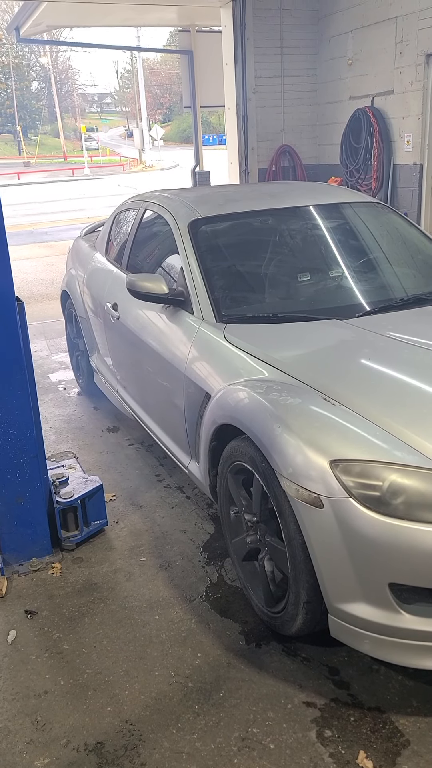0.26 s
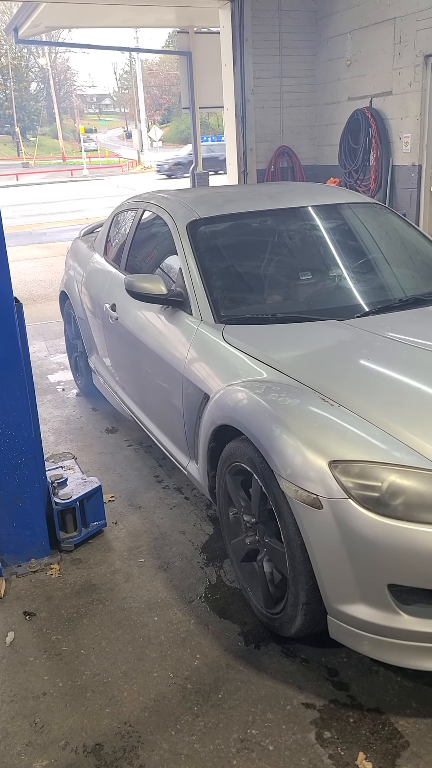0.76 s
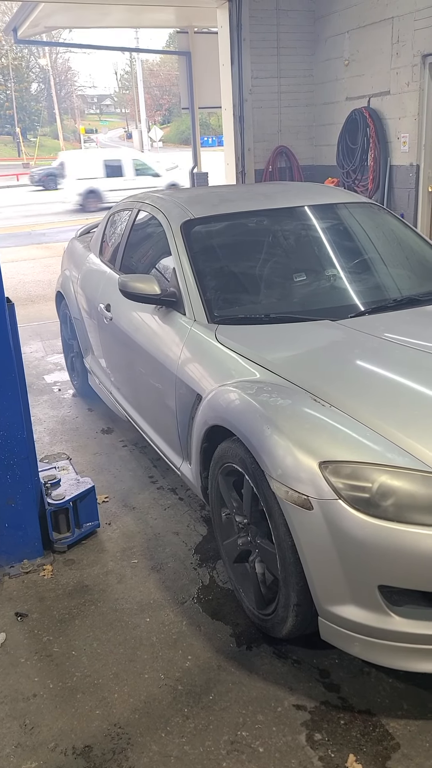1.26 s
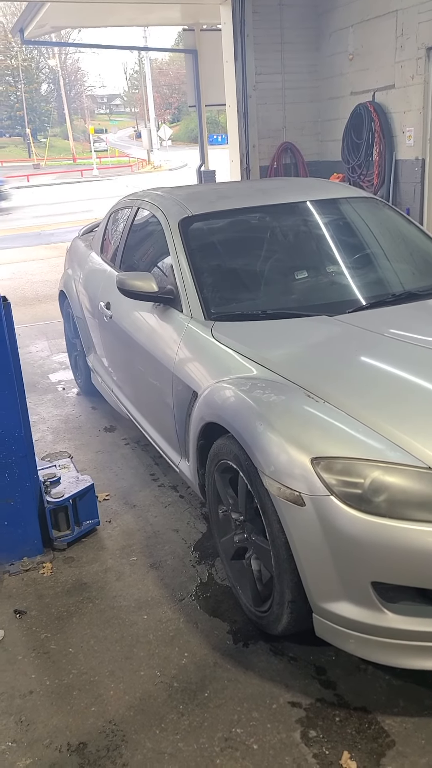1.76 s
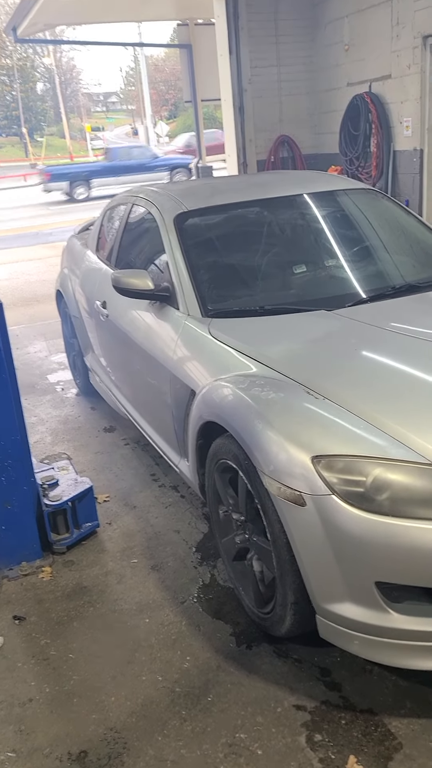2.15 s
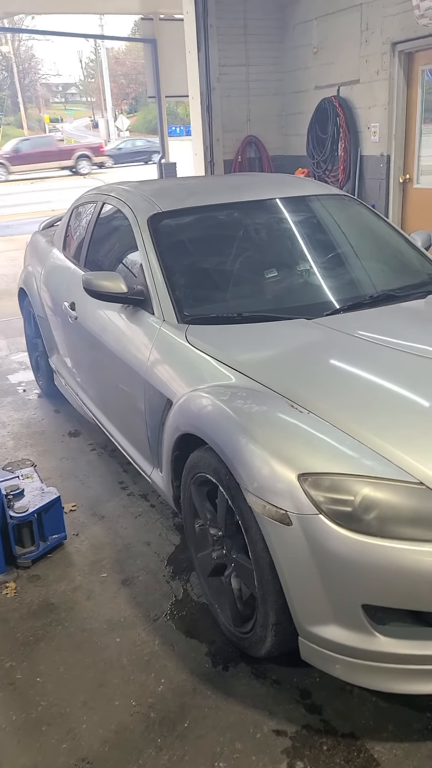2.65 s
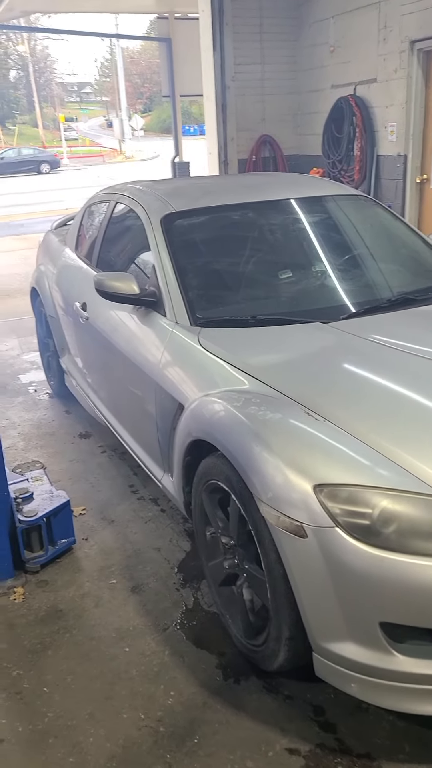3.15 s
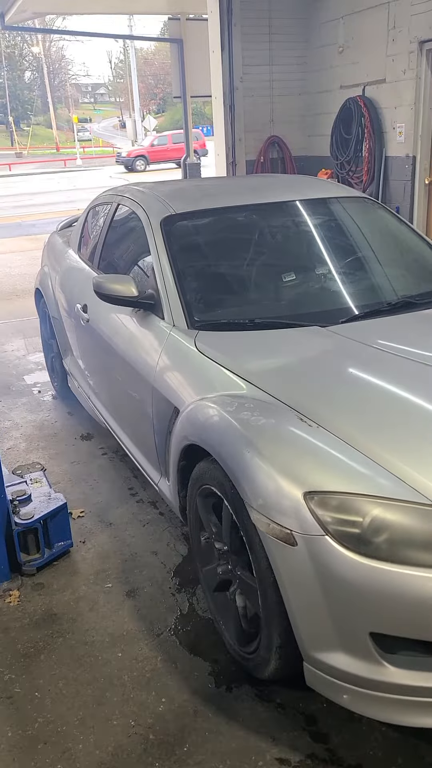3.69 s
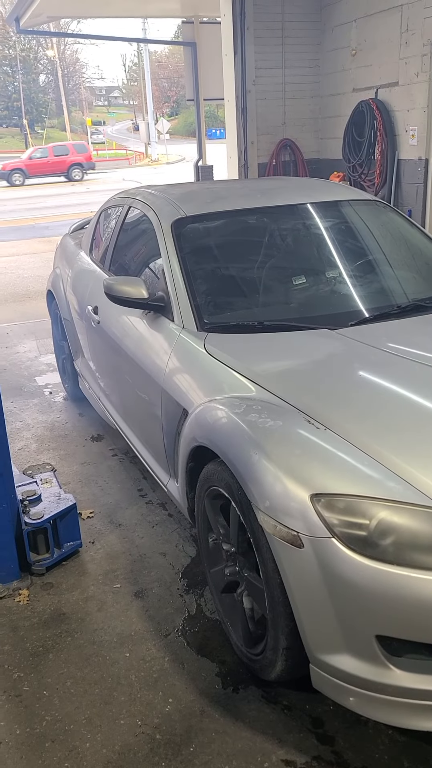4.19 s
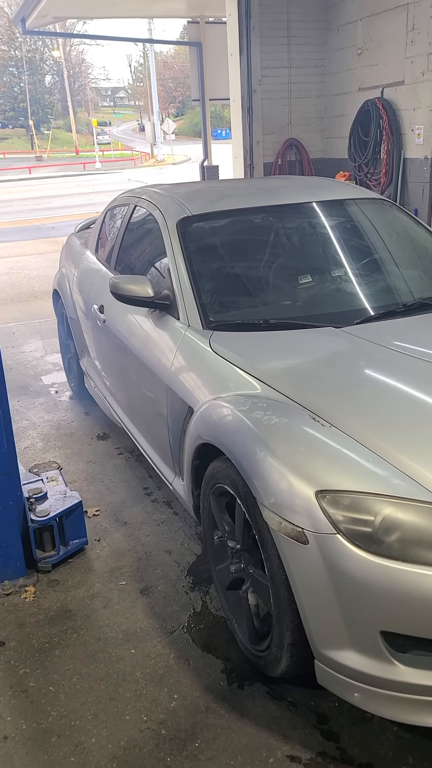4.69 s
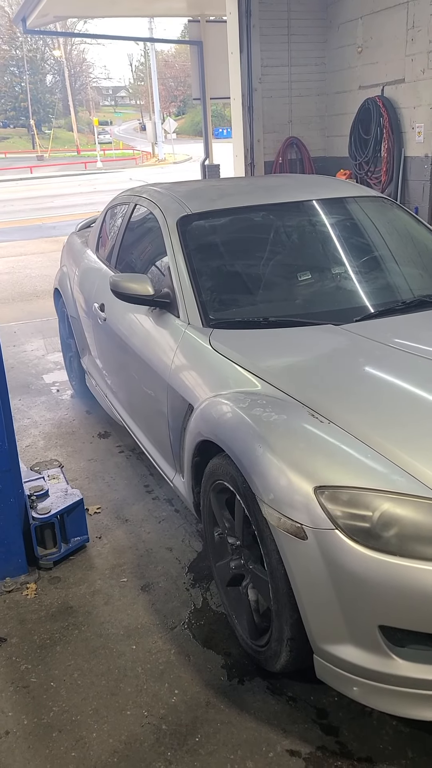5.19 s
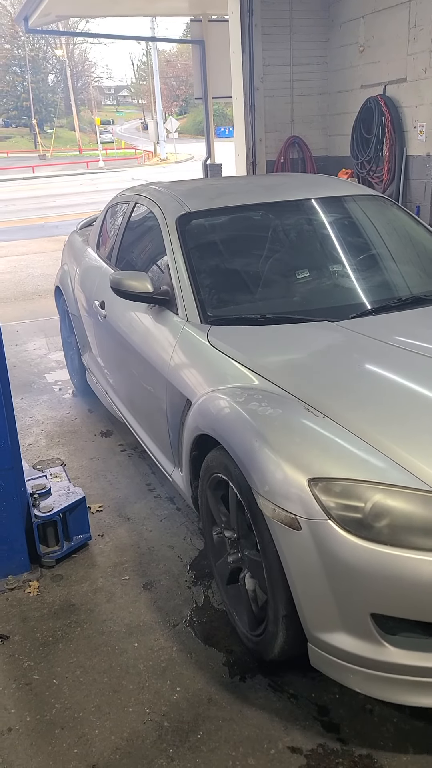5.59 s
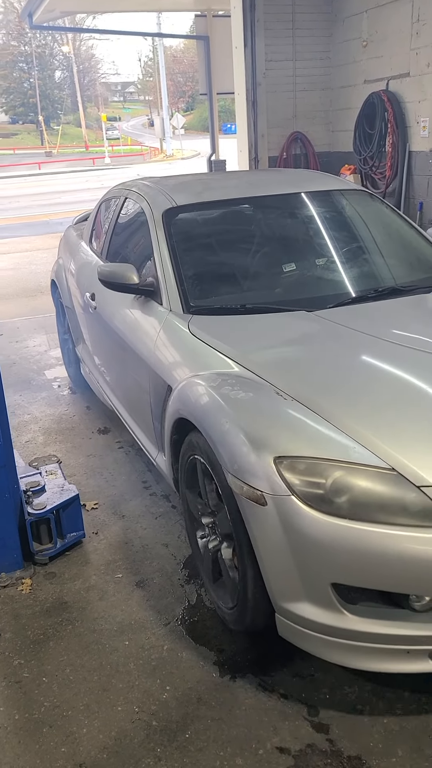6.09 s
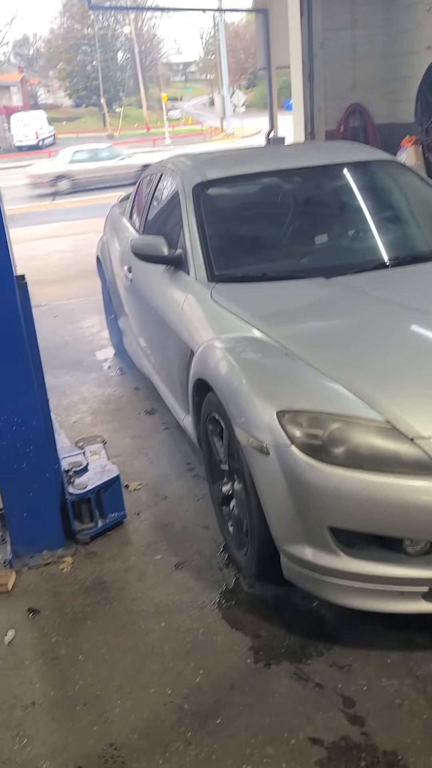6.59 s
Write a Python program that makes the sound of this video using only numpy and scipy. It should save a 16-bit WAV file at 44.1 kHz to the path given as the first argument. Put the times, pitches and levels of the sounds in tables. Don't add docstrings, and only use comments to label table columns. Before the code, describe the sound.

A car engine hums at a fast, steady idle in a concrete garage, then sags, stumbles roughly and settles into a lower, throbbing idle.

```python
import sys
import numpy as np
from scipy import signal
from scipy.fft import rfft, irfft, next_fast_len
from scipy.io import wavfile
from scipy.ndimage import uniform_filter1d

SR = 44100
rng = np.random.default_rng(int(sys.argv[2]) if len(sys.argv) > 2 else 0)


def wrap_up_sound(samples):
    columns = np.atleast_2d(samples).T
    tamed = np.clip(columns, -1, 1)
    steps = np.round(tamed * 32767).astype(np.int16)
    wavfile.write(sys.argv[1], SR, steps)


def magnitude_from_level(level_db):
    exponent = np.asarray(level_db, float) / 20
    return 10 ** exponent


N = 301644


def rms_one(x):
    return x / np.sqrt(np.mean(x ** 2) + 1e-20)


def in_time(rows):
    times_s, values = np.transpose(rows)
    return np.interp(np.arange(N) / SR, times_s, values)


def ramp(from_s, takes_s):
    return np.clip((np.arange(N) / SR - from_s) / takes_s, 0, 1)


def at_hz(points, hz):
    points = np.array(points)
    return np.interp(np.log(hz), np.log(points[:, 0]), points[:, 1])


def fft_hz():
    return np.maximum(np.arange(N // 2 + 1) * SR / N, 1)


def per_turn(turns):
    return np.interp(turns, np.arange(400), rng.standard_normal(400))


def garage(x):
    t60_s, wall_cut_hz = 0.84, 550
    size = next_fast_len(N + 2 * SR)
    hz = np.arange(size // 2 + 1) * SR / size
    out = np.zeros((2, len(hz)), complex)
    for k, lag_s in enumerate(rng.uniform(.021, .058, 16)):
        wall = magnitude_from_level(-60 * lag_s / t60_s) / (1 + 1j * hz / wall_cut_hz)
        loop = wall * np.exp(-2j * np.pi * hz * lag_s)
        out[k % 2] += loop / (1 - loop) * (-1) ** (k // 2)
    return irfft(out * rfft(x, size), size)[:, :N] / 4


# (frequency [Hz], likeness [-1 to 1])
EAR_LIKENESS = [(60, 0.42), (180, 0.74), (550, 0.32), (1650, -0.2), (4970, -0.012), (15000, -0.031)]
# (frequency [Hz], left minus right [dB])
LEFT_OVER_RIGHT = [(60, -1.0), (92, -1.0), (140, 0.5), (210, 0.0), (330, -1.0), (500, -2.0), (770, -1.0),
                   (1170, 1.0), (1790, -1.5), (2740, -0.5), (4190, -1.0), (6410, 2.5), (9810, -5.0),
                   (15000, -2.0)]


def air_noise(spectrum):
    hz = fft_hz()
    mid, side = rfft(rng.standard_normal((2, N)))
    alike = np.clip(at_hz(EAR_LIKENESS, hz), -1, 1)
    sides = np.array([[1], [-1]])
    both = np.sqrt(1 + alike) * mid + np.sqrt(1 - alike) * side * sides
    level_db = at_hz(spectrum, hz) + sides * at_hz(LEFT_OVER_RIGHT, hz) / 2
    return rms_one(irfft(both * magnitude_from_level(level_db), N))


def mottled(x, patch_db):
    cells = signal.stft(x, nperseg=1024)[2]
    patches = uniform_filter1d(rng.standard_normal(cells.shape), size=5, axis=1)
    patches = uniform_filter1d(patches, size=9, axis=2)
    ripple = uniform_filter1d(rng.standard_normal(cells.shape[:2]), size=2, axis=1)[..., None]
    colour_db = patch_db * rms_one(patches) + 0.9 * rms_one(ripple)
    return rms_one(signal.istft(cells * magnitude_from_level(colour_db), nperseg=1024)[1][:, :N])


def throb(firings, throb_db):
    every_firing = np.cos(2 * np.pi * (firings - .15))
    one_rotor = .7 * np.cos(np.pi * (firings - .4))
    return magnitude_from_level(throb_db * (every_firing + one_rotor) + 0.8 * per_turn(firings))


# (frequency [Hz], level [dB per Hz])
RUMBLE_COLOUR = [(25, -17), (60, -13), (150, 13), (300, 9.5), (500, 0.5), (800, -0.5), (1050, -2.5),
                 (1300, -4), (2000, -25)]


def gas_rumble(firings, rumble_db):
    puffs = magnitude_from_level(2.15 * np.cos(2 * np.pi * (firings - .05)))
    return magnitude_from_level(rumble_db + 1.5) * puffs * air_noise(RUMBLE_COLOUR)


# (frequency [Hz], level [dB per Hz])
TICK_COLOUR = [(500, -40), (800, 15), (1050, 0), (1300, 6), (1800, -12.5), (2050, -28), (2400, -8.5),
               (3200, -3.5), (5000, -22.5)]


def shaft_tick(firings, ring_s):
    at = np.flatnonzero(np.diff(np.floor(firings / 2 + .4)))
    clicks = np.zeros(N)
    clicks[at] = magnitude_from_level(1.5 * rng.standard_normal(200)[:len(at)])
    dying_db = -60 * np.arange(SR // 4) / SR / ring_s
    clatter = rng.standard_normal((2, SR // 4)) * magnitude_from_level(dying_db)
    ticks = signal.fftconvolve(clicks[None], clatter, axes=1)[:, :N]
    return rms_one(irfft(rfft(ticks) * magnitude_from_level(at_hz(TICK_COLOUR, fft_hz())), N))


# (frequency [Hz], level [dB per Hz])
WHIRR_COLOUR = [(760, -10), (1300, -1), (1380, -2), (1660, -0.5), (1810, 1.5), (2030, -3.5), (2290, 2.5),
                (2790, -2), (4530, 1), (4980, -7), (5430, -6.5), (5920, -4), (8500, -10), (11000, -24),
                (18700, -120)]


def engine_whirr(firings, whirr_db, throb_db):
    noise = mottled(air_noise(WHIRR_COLOUR), patch_db=3.5)
    return magnitude_from_level(whirr_db + 2.5) * throb(firings, 0.46 * throb_db) * noise


# (frequency [Hz], level [dB per Hz])
HISS_COLOUR = [(3240, -24.5), (5500, -2.5), (5950, -13), (7190, -3), (8050, -4), (9210, 0), (10800, -3),
               (11800, -1), (13500, -5), (15700, -6)]


def intake_hiss(firings, hiss_db, throb_db):
    noise = mottled(air_noise(HISS_COLOUR), patch_db=2.0)
    return magnitude_from_level(hiss_db + 3.5) * throb(firings, throb_db) * noise


def waves_db(waves, hz):
    return sum(db / (1 + (2 * (hz - at) / width) ** 2) for at, width, db in waves)


def line_db(levels_db, k, speed):
    return np.interp(k * speed + k % 1, np.arange(len(levels_db)) + 1, levels_db, right=-70)


# (fast whole [dB], fast half below [dB], slow whole [dB], slow half below [dB])
PULSE_ORDERS = [(-32, -46, -35, -34), (-8.5, -33.5, 1.5, -67), (0.5, -29.5, 1.34, -17), (-4, -30, -1, -40),
                (-9, -21, 0, -43), (-18.5, -28.5, -10.5, -59), (-15.5, -28, -5, -33),
                (-33, -39, -17.5, -22.5), (-35.5, -50, -16.5, -66), (-39, -45.5, -17, -69),
                (-57, -38.5, -22, -29.5), (-35.5, -36.5, -21, -76), (-56, -35.5, -49, -55.5),
                (-42, -42.5, -33, -24.5), (-38, -37, -31, -32), (-40, -72, -57.5, -30),
                (-50, -53.5, -63, -29.5), (-37, -42, -40, -33), (-41, -46, -54, -35.5),
                (-55, -52, -44.5, -28.5), (-39, -57, -41, -30.5), (-70, -70, -52, -33),
                (-72, -77, -50, -33), (-70, -70, -41, -37)]
HIGH_ORDERS = (-56, -70, -50, -36)
# (frequency [Hz], level [dB])
SECOND_ORDER = [(47, -37), (53, -50), (59, -35), (61.4, -28.5), (63, -31.5), (68, -41), (74, -18),
                (85, -18.5), (93, -25), (97, -22), (99, -22)]
# (frequency [Hz], width [Hz], lag [cycles])
PIPE_RESONANCES = [(74, 5, .45), (168, 12, .2), (207, 8, -.2)]
# (frequency [Hz], width [Hz], level [dB])
GARAGE_WAVES = [(46.26, 1.3, 16), (284.3, 4.5, 4.5), (285.4, 7.1, -9), (465, 16, 8), (494, 2.8, 14),
                (557, 2.7, -4), (607.4, 9.8, 6.5), (642, 3.6, 10), (677, 3.7, 1), (692, 11, 7),
                (715, 3.8, -2), (733, 5.9, 11), (817, 9.84, 17), (900, 20, -2),
                (85, 4.8, 2.5), (92.9, 3.2, -3), (106, 4.4, 5), (112, 3.3, -0.5), (127.4, 5, -1.5),
              (140.23, 2.85, -13.5), (152.4, 3.33, -13), (197.4, 11.5, -8.5), (215.4, 3.06, -16.5),
              (235.9, 3.3, 4.5), (247.6, 3.2, -4), (325.7, 4.3, 6), (331.4, 2.9, -14.5), (342.9, 2.86, -9)]
# (frequency [Hz], width [Hz], level [dB])
STEP_BACK_WAVES = [(94, 11, 2.5), (125, 9.1, -10), (190, 11, -6), (221, 11.2, -4.5), (641.3, 18.3, 13)]


def exhaust(*controls):
    step = 16
    firing_hz, firings, misfire_db, burn_db, slow, moved = [c[::step] for c in controls]
    fast_idle_hz, slow_idle_hz = 48.2, 31.3
    out = np.zeros((2, len(firings)))
    uneven_db = misfire_db * per_turn(firings)
    lines = np.array(PULSE_ORDERS + [HIGH_ORDERS] * 7)
    echo_turn = np.sin(2 * np.pi * (firing_hz - slow_idle_hz) / (fast_idle_hz - slow_idle_hz))
    for k in np.arange(1, 63) / 2:
        hz = k * firing_hz
        half = int(k % 1 > 0)
        twist, spread, apart = rng.standard_normal(3)
        scattered = np.clip(hz / 800, 0, 1) ** 2

        standing_db = waves_db(GARAGE_WAVES, hz) + moved * waves_db(STEP_BACK_WAVES, hz)
        fast_db = -14 + line_db(lines[:, half], k, firing_hz / fast_idle_hz)
        slow_db = -19 + line_db(lines[:, 2 + half], k, firing_hz / slow_idle_hz)
        fading_db = 2.5 * np.sqrt(scattered) * per_turn(firings / 14)
        felt_db = burn_db * np.interp(k, [3, 8.8], [0.26, 1])
        level_db = (1 - slow) * fast_db + slow * slow_db + felt_db + standing_db + fading_db
        if k == 2:
            level_db = at_hz(SECOND_ORDER, hz)
        splash_db = misfire_db * (1 + .25 * misfire_db) * per_turn(firings)
        level_db = level_db + uneven_db + splash_db

        late = sum(lag * np.arctan((hz - at) / width) / np.pi for at, width, lag in PIPE_RESONANCES) - .21
        late = late + .2 * twist * echo_turn
        late = late + .006 * uneven_db * (1 + misfire_db / 2) * min(k, 14)
        late = late + spread * (.2 * scattered + .4 * (k % 1) * (k < 7))
        ports = (.00023 * hz + .11 * apart) * scattered * [[1], [-1]]
        out -= magnitude_from_level(level_db) * np.sqrt(2) * np.cos(2 * np.pi * (k * firings - late - ports))
    return signal.resample_poly(out, step, 1, axis=1)[:, :N]


# (time [s], firing rate [Hz])
ENGINE_SPEED = [(0, 49.3), (.25, 48.75), (.36, 47.52), (.63, 46.74), (.9, 46.6), (1.15, 47.54),
                (1.96, 48.15), (2.34, 48.43), (2.57, 43.7), (2.9, 26.99), (3.11, 23.62), (3.31, 26.35),
                (3.6, 29.32), (3.9, 31.63), (4.1, 31.52), (4.55, 30.71), (5.35, 31.36), (6.84, 31.65)]
# (time [s], spread [dB])
UNEVEN_BURN = [
    (0, .25),
    (2.35, .25),
    (2.55, 1.6),
    (3.15, 1.8),
    (3.4, 1.0),
    (3.8, .9),
    (4.0, .4),
    (6.84, .35),
]
# (time [s], level [dB])
BURN_STRENGTH = [
    (0, 1),
    (2.35, 0.5),
    (2.55, -4),
    (2.75, -8),
    (2.95, -11.5),
    (3.2, -8.5),
    (3.7, -2),
    (4.6, -.5),
    (6.84, .5),
]
# (time [s], level [dB])
AIR_FLOW = [(0, -43), (.4, -44), (1.0, -46.5), (1.4, -44), (2.27, -45), (2.38, -42), (2.46, -42.5),
            (2.7, -49.5), (2.84, -70), (3.12, -59), (3.27, -45), (3.4, -43), (3.69, -38.5), (6.84, -38)]


def scene():
    firing_hz, misfire_db = in_time(ENGINE_SPEED), in_time(UNEVEN_BURN)
    burn_db, hiss_db = in_time(BURN_STRENGTH), in_time(AIR_FLOW)
    slow = ramp(from_s=2.73, takes_s=0.42)
    moved = ramp(from_s=6.03, takes_s=0.77)
    firings = .7 + np.cumsum(firing_hz) / SR

    flow_db = hiss_db + 45
    whirr_db = -46.5 + 0.4 * flow_db + 3 * slow
    rumble_db = -39 + 0.13 * flow_db + 2.5 * slow + 1.2 * misfire_db
    throb_db = .6 + (0.98 - .6) * slow + 0.34 * misfire_db

    rumble = gas_rumble(firings, rumble_db)
    tick = magnitude_from_level(whirr_db - 5.5) * shaft_tick(firings, ring_s=.2)
    whirr = engine_whirr(firings, whirr_db, throb_db)
    hiss = intake_hiss(firings, hiss_db, throb_db)
    pipe = exhaust(firing_hz, firings, misfire_db, burn_db, slow, moved)
    walls = magnitude_from_level(-15) * garage(pipe.mean(axis=0))
    return pipe * magnitude_from_level([[-.1], [.1]]) + walls + rumble + hiss + whirr + tick


def band_limit(x):
    return signal.sosfilt(signal.butter(12, 15770, fs=SR, output="sos"), x)


def record(dry):
    mix = 1.477 * np.tanh(dry / 1.444)
    return band_limit(mix)


dry = scene()
out = record(dry)
wrap_up_sound(out)
```